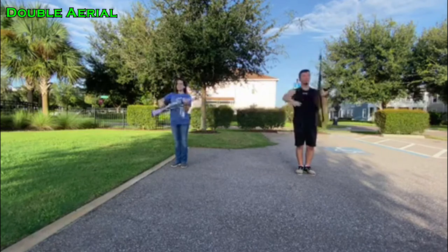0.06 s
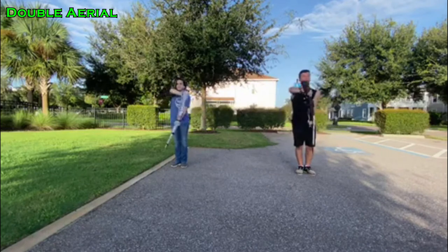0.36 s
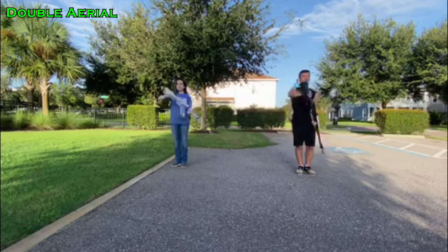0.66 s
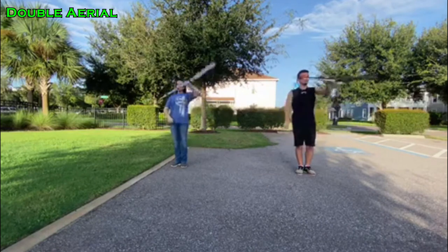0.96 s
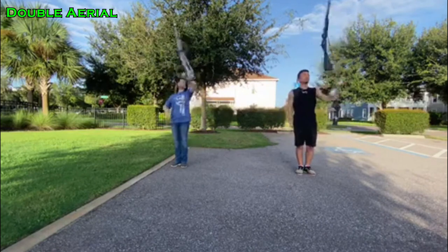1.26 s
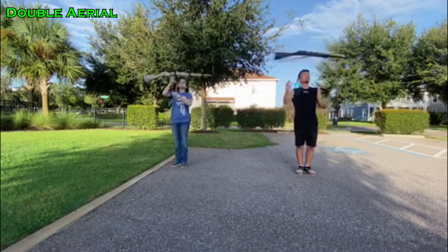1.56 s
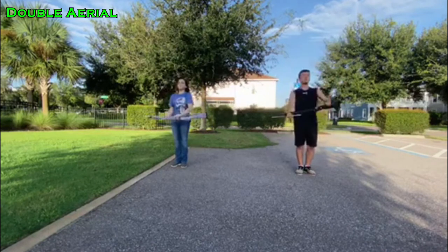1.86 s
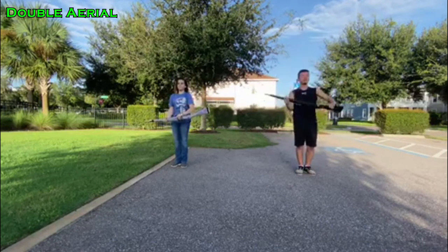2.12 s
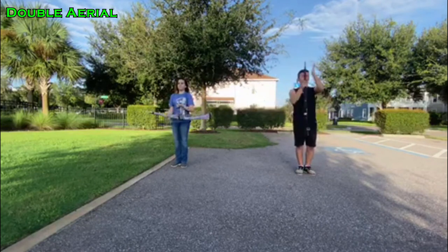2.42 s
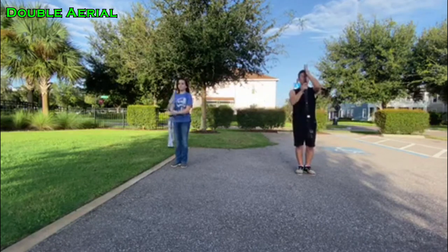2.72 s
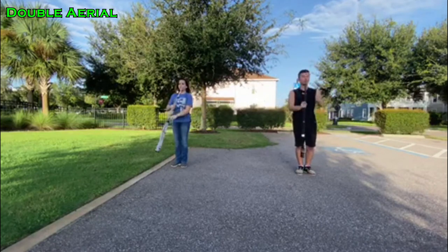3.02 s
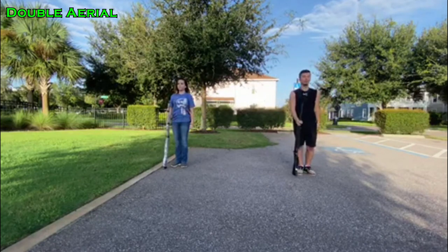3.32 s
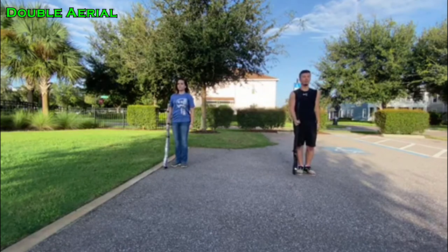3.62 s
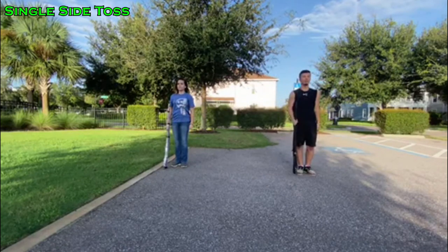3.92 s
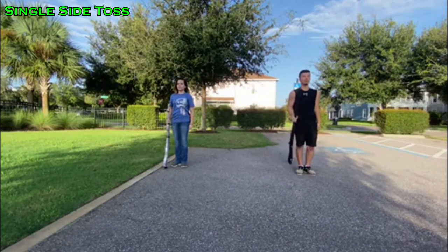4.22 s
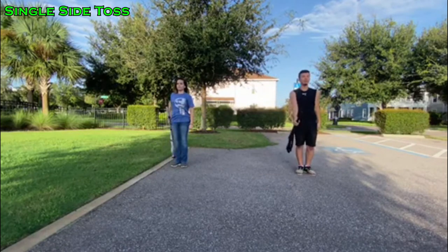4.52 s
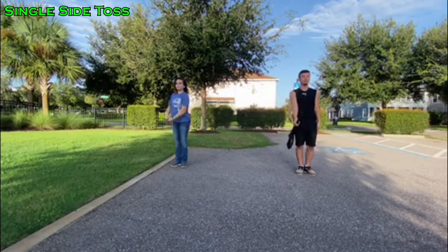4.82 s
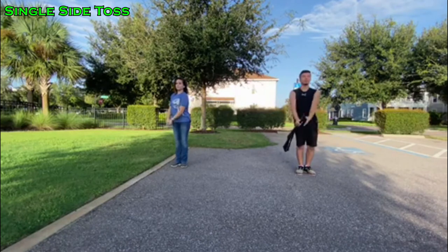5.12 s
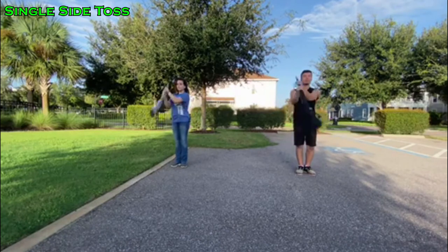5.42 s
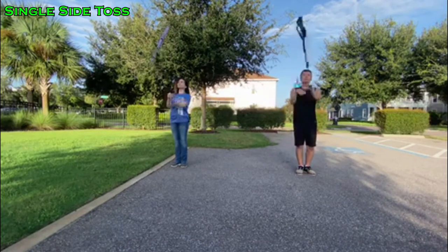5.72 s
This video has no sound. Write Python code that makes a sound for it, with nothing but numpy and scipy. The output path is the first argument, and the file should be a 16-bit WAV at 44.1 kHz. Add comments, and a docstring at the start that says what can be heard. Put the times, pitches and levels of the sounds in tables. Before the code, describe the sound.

Drill rifles are handled on an open street, over a low breeze and distant traffic. For the first second and a half, light palm slaps on wooden stocks mix with small clicks and jiggles of loose steel. At about 1.8 seconds comes a loud catch, a quick cluster of hollow slaps and metal clatter. The wind drops just after 2 seconds. A soft sliding rustle follows, then another slap with rattling strap swivels at 2.5. Around 3 seconds a bird gives one faint, thin, falling whistle. The rifle butts hit the asphalt at 3.2, the loudest moment, and again at 3.35, with hard knocks and bright steel pings, and the swivels bounce to rest by 3.5. A small clink comes at 3.9, a light pat at 4.9 and a bright click at 5.2. The hits echo faintly, and far tyre hiss swells slightly toward the end, near 6 seconds.

```python
"""Sharp slaps and metal rattles ring out as two people spin, toss and catch drill rifles on a street.
Palms hit the wooden stocks and the butts land hard on the asphalt; every blow shakes the loose steel.
Strap swivels flop, and the rifles rustle as they slide. A bird whistles once; trees and houses echo
faintly. Behind it all, a light wind dies down and far traffic rumbles."""
import sys
import numpy as np
from scipy import signal
from scipy.fft import rfft, irfft, next_fast_len
from scipy.io import wavfile
from scipy.ndimage import uniform_filter1d

SR = 44100
rng = np.random.default_rng(int(sys.argv[2]) if len(sys.argv) > 2 else 0)


def bounce(signal):
    """Save signal as a 16-bit WAV file at the path given by the first command-line argument."""
    frames = np.transpose(np.atleast_2d(signal))
    limited = np.clip(frames, -1, 1)
    pcm = np.round(limited * 32767).astype(np.int16)
    wavfile.write(sys.argv[1], SR, pcm)


N = 258867
TIME = np.arange(N) / SR


# blows from a palm or the ground: (time [s], relative level [dB], pop pitch [Hz], steel clash [dB])
BLOWS = [(0.052, -31.5, 617, -41), (0.18, -27, 720, -29), (.199, -36, 1010, -30), (0.237, -34, 1310, -37),
         (0.752, -37, 1190, -42), (1.429, -31.5, 1060, -51.5), (1.699, -32, 1570, -26.5),
         (1.7651, -15.5, 870, -17), (1.768, -12.5, 560, -29), (1.7713, -17, 1730, -21.5),
         (1.791, -19.5, 1546, -25.5), (1.855, -31, 1330, -60), (2.5311, -19, 842, -31),
         (3.21, -8.5, 857, -11.5), (3.213, -22, 218, -40), (3.219, -7.5, 1310, -19),
         (3.231, -18, 1320, -31.5), (3.338, -13, 1290, -18), (3.339, -15, 492, -26),
         (3.376, -28, 885, -24.5), (3.398, -37, 1210, -38.5), (4.865, -32, 960, -58),
         (5.168, -35, 1550, -55), (5.218, -37, 1180, -66)]
# the notes a wooden stock rings at: (pitch [Hz], width [Hz], level [dB])
STOCK_NOTES = [(244, 230, -10), (506, 83, -11), (694, 57, -4), (830, 35, -6), (1370, 300, -5.5),
               (1400, 85, 2), (1640, 68, -7.5)]
def slaps(gain_db=-1.06, pop_width=0.45, stock_db=-3, dull_hz=2600):
    """Each blow makes a hollow pop while the wooden stock knocks."""
    out = np.zeros((2, N))
    for start, db, pop_hz, _ in BLOWS:
        def colour(hz):
            pop = resonance(hz, pop_hz, pop_width * pop_hz) ** 2
            knock = amp(stock_db) * body(STOCK_NOTES, hz)
            return (pop + knock) / (1 + (hz / dull_hz) ** 2)
        add(out, start, amp(db + gain_db) * contact(colour, ring_s=0.026, attack_s=0.0002))
    return out


# a loose bolt, buckle or butt plate clicks: (time [s], relative level [dB], brightness [dB])
LOOSE_CLICKS = [(0.096, -45, 0), (0.174, -36, -2.5), (0.352, -42.5, -1), (0.701, -41, 3.5), (0.808, -35, 5),
                (0.818, -38, 6), (0.856, -41, 5), (0.894, -32.5, 3.5), (1.092, -36, 0), (1.19, -49, 1.5),
                (1.69, -33, -2.5), (1.791, -14, 3.5), (1.803, -24.5, 0.5), (1.865, -29.5, 0.5),
                (1.94, -45.5, -3), (2.37, -40.5, 3), (2.492, -38.5, -2.5), (2.511, -29, -0.5),
                (2.558, -37.5, -3), (2.617, -34, 2), (3.16, -47.5, -1.5), (3.2012, -31, -5.5),
                (3.265, -22, 6), (3.905, -44, 1.5), (4.373, -54.5, -3.5), (5.1666, -23.5, 6.5)]
def fittings():
    """The steel parts clash with every blow and click one by one in between."""
    out = np.zeros((2, N))
    for start, _, _, db in BLOWS:  # many parts meet less sharply than one
        add(out, start, click(db, bright_db=1, ring_s=0.058, attack_s=0.0019))
    for start, db, bright_db in LOOSE_CLICKS:
        ring_s = 0.019 * np.exp(-0.2051 * bright_db)  # smaller, brighter parts go quiet sooner
        add(out, start, click(db, bright_db, ring_s, attack_s=0.00035))
    return out


# the low, middle and high parts of a click: (pitch [Hz], relative level [dB])
CLACK = [(80, -59.5), (300, -7.5), (1100, 3), (1900, -4), (3050, -6.5), (4500, 0), (8000, -60)]
CLINK = [(2000, -48.5), (3800, 0), (5200, 16.5), (6500, 8), (7500, 5.5), (11000, -8.5)]
SIZZLE = [(4000, -48), (7300, -2.5), (9000, 6), (10500, -3), (12400, -2.5), (13500, -2.5), (15000, -5.5),
          (16000, -16.5)]
def click(db, bright_db, ring_s, attack_s):
    """Steel hits steel; more brightness tips the sound from a clack to a sizzle."""
    shares = amp([0.5 - bright_db, -2.5, -0.5 + bright_db])  # clack, clink, sizzle

    def colour(hz):
        metal = steel(hz, crack_db=-12)
        bands = [unit(amp(along(band, hz)) * metal) for band in (CLACK, CLINK, SIZZLE)]
        return sum(share * band for share, band in zip(shares, bands))
    return amp(db) * np.linalg.norm(shares) * contact(colour, ring_s, attack_s)


# the notes the steel parts ring at: (pitch [Hz], width [Hz], level [dB])
STEEL_NOTES = [(2450, 290, 0.5), (2870, 180, 2), (4440, 70, -9), (5107, 87, -8.5), (5980, 250, -1),
               (6430, 81, 1.5), (9140, 100, -12), (10310, 290, -4.5), (12340, 240, -7.5),
               (14850, 200, -8.5)]
def steel(hz, crack_db):
    """The tone of a crack plus ringing steel; each hit rings other parts, so the pitches vary."""
    return 1j * amp(crack_db) + body(STEEL_NOTES, hz, pitch_spread=0.043)


# a strap swivel flops, or bounces to rest once the rifles are down: (time [s], level [dB])
SWIVEL_FLOPS = [(0.359, -42.5), (0.712, -45.5), (0.909, -36), (1.701, -24), (1.723, -25), (2.532, -26.5),
                (2.545, -34), (2.618, -31), (2.626, -40.5), (3.422, -32.5), (3.472, -36.5), (3.505, -38)]
# the notes a swivel rings at: (pitch [Hz], width [Hz], level [dB])
SWIVEL_NOTES = [(1220, 277, -6.5), (2407, 350, -2.5), (2850, 380, 1.5)]
def swivels(dull_hz=4500):
    """A swivel knocks on the wood with a short, hollow ring."""
    out = np.zeros((2, N))
    colour = lambda hz: body(SWIVEL_NOTES, hz, pitch_spread=0.025) / (1 + (hz / dull_hz) ** 4)
    for start, db in SWIVEL_FLOPS:
        add(out, start, amp(db) * contact(colour, ring_s=0.046, attack_s=0.0003))
    return out


# a moving rifle keeps its loose parts jiggling: (start [s], end [s], level [dB])
SHAKES = [(0.184, 0.263, -45.5), (0.341, 0.394, -54), (0.698, 0.79, -57.5), (0.799, 0.837, -52.5),
          (0.905, 0.93, -53), (1.704, 1.735, -40), (1.776, 1.8, -35.5), (2.493, 2.547, -46),
          (3.041, 3.11, -58.5), (3.225, 3.267, -32.5)]
def jiggle(ring_s=0.024, centre_hz=7000, top_hz=12000):
    """Swivels and buckles tick unevenly; the harder the shake, the faster the ticks come."""
    def colour(hz):
        treble = resonance(hz, centre_hz, 2 * centre_hz) ** 2 / (1 + (hz / top_hz) ** 10)
        return steel(hz, crack_db=-9) * treble

    out = np.zeros((2, N))
    for start, end, db in SHAKES:
        length = end - start
        t = np.arange(round((length + ring_s) * SR)) / SR
        ticks_per_s = 150 * np.exp(0.02 * (db + 37))
        count = max(int(length * ticks_per_s), 1)
        tick_times = (np.arange(count) + rng.random(count)) * length / count
        age = t - tick_times[:, None]
        strength = amp(6 * rng.uniform(-0.49, 1, (count, 1)))
        envelope = np.sum(strength * (age > 0) * fade(np.abs(age), ring_s), axis=0)
        ticks = rng.standard_normal((2, len(t))) * envelope
        add(out, start, amp(db) * unit(filtered(ticks, colour)))
    return out


# small steel parts ringing freely: (time [s], level [dB], pitch [Hz], ring time [s])
STEEL_PINGS = [(0.392, -35.5, 9600, 0.067), (1.696, -29, 6620, 0.048), (3.21, -14, 5250, 0.02),
               (3.337, -22, 6000, 0.025), (3.377, -21, 6170, 0.022), (3.903, -41.5, 5860, 0.042),
               (5.167, -25, 9960, 0.013)]
def pings(attack_s=0.0008, detune=0.0042):
    """A small steel part swings free and rings on two notes so close that they shimmer."""
    out = np.zeros((2, N))
    t = np.arange(SR // 2) / SR
    for start, db, hz, ring_s in STEEL_PINGS:
        notes = [(0.98, hz), (0.5, hz * (1 + detune))]
        ring = sum(share * np.sin(2 * np.pi * (pitch * t + rng.random())) for share, pitch in notes)
        add(out, start, amp(db) * ring * strike(t, ring_s, attack_s))
    return out


# a rifle slides through a hand, along its strap or over the ground:
# (time [s], half length [s], level [dB])
SLIDES = [(2.228, 0.061, -58.5), (2.363, 0.015, -52.5), (3.265, 0.012, -23.5), (5.526, 0.12, -69.5)]
# the tone of that sliding: (pitch [Hz], relative level [dB])
SLIDE_TONE = [(3500, -17.5), (5800, 3), (7500, -5), (9500, -2), (15500, -9.5)]
def rustles(grain_db=5):
    """Sliding makes a soft, grainy hiss that swells and fades."""
    envelope = sum(amp(db) * bump(middle, half) for middle, half, db in SLIDES)
    grains = amp(grain_db * wobble(200)) * stereo_noise(N, RIFLE_LIKENESS, RIFLE_BALANCE)
    return envelope * shaped(grains, SLIDE_TONE)


# how alike the rifles sound on the left and right: (pitch [Hz], likeness [0 to 1])
RIFLE_LIKENESS = [(250, 1), (1400, 0.88), (4000, 0.33), (9000, 0.773)]
# which side they are louder on: (pitch [Hz], left minus right [dB])
RIFLE_BALANCE = [(200, -0.5), (550, 10), (1200, 5), (2300, -2), (4500, -3.5), (8000, 0.5)]
def contact(colour, ring_s, attack_s):
    """Hard parts chatter for an instant as they meet; colour gives the tone of the thing they hit."""
    t = np.arange(SR // 10) / SR
    envelope = strike(t, ring_s, attack_s)
    chatter = stereo_noise(len(t), RIFLE_LIKENESS, RIFLE_BALANCE) * envelope
    # a sharp blow feeds all pitches about evenly, so flatten the noise before colouring it
    power = np.mean(np.abs(rfft(chatter, padded(len(t)))) ** 2, axis=0)
    flatten = np.abs(uniform_filter1d(power, size=33)) ** -0.5
    hit = filtered(chatter, lambda hz: flatten * colour(hz))
    return unit(hit) * np.sqrt(np.mean(envelope ** 2))


# the bird's whistle starts, holds, swells and trails away: (time [s], pitch [Hz], level [dB])
WHISTLE = [(2.86, 3470, -75), (2.878, 3440, -62), (2.972, 3365, -59), (3.0, 3295, -46), (3.036, 3300, -52),
           (3.05, 3265, -61), (3.14, 3160, -68)]
def bird(flutter_db=2, upper_hz=5980, upper_db=-66):
    """A bird gives one thin, wavering, falling whistle, with a faint second note held above it."""
    def tone(pitch, waver):
        wavering_hz = pitch * (1 + waver * wobble(120))
        return np.sin(2 * np.pi * np.cumsum(wavering_hz) / SR)

    times, hz, db = np.transpose(WHISTLE)
    singing = (TIME > times[0]) & (TIME < times[-1])
    arch = np.sin(np.pi * np.interp(TIME, [times[0], times[-1]], [0, 1]))
    loudness = amp(np.interp(TIME, times, db) + flutter_db * wobble(500))
    whistle = singing * loudness * tone(np.interp(TIME, times, hz), waver=0.0045)
    return whistle + amp(upper_db) * arch * tone(upper_hz, waver=0.012)


# how long trees and houses keep echoing: (pitch [Hz], ring time [s])
ECHO_TIMES = [(1000, 0.18), (5000, 0.66), (14000, 0.38)]
def echoes(sound, near_db=-15, near_ring_s=0.14, near_per_s=400, far_db=-15.5):
    """Sound bounces quickly off the ground and the people, then faintly off trees and houses."""
    hz, t, spectrum = signal.stft(rng.standard_normal((2, SR)), SR, nperseg=256)
    spectrum *= fade(t, along(ECHO_TIMES, hz)[:, None])
    far = signal.istft(spectrum, SR, nperseg=256)[1][:, :SR]
    bounces = rng.standard_normal((2, SR)) * (rng.random(SR) < near_per_s / SR)
    near = bounces * fade(np.arange(SR) / SR, near_ring_s)
    answer = (amp(near_db) * unit(near) + amp(far_db) * unit(far)) / np.sqrt(SR)
    return signal.fftconvolve(sound, answer, axes=1)[:, :N]


# short gusts: (time [s], half length [s], rise [dB])
WIND_GUSTS = [(1.73, 0.12, 9), (3.6, 0.06, 10)]
# the wind's low rumble: (pitch [Hz], relative level [dB])
WIND_TONE = [(18, -39.5), (47, -5), (68, -1.5), (150, -6.5), (330, -20), (600, -72)]
def wind(breeze_db=-40, lull_db=-51, drop_at_s=2.076, drop_length_s=0.036):
    """A breeze rumbles, then drops to a lull; two gusts rise on top of it."""
    base_db = np.interp(TIME, [drop_at_s, drop_at_s + drop_length_s], [breeze_db, lull_db])
    return amp(base_db + swells(WIND_GUSTS)) * rush(WIND_TONE)


# cars swell the drone, and their tyres hiss louder as they near: (time [s], half length [s], rise [dB])
DRONE_SWELLS = [(2.0, 0.24, 8), (4.18, 0.073, 6), (4.7, 0.041, 4), (5.0, 0.73, 5.5)]
TYRE_SWELLS = [(6.4, 6.03, 4.5), (5.45, 0.86, 3)]
# the tone of the drone and of the hiss: (pitch [Hz], relative level [dB])
DRONE_TONE = [(50, -37.5), (100, -0.5), (165, -8), (220, 1.5), (290, -7), (400, -9), (1200, -34.5),
              (3000, -55.5), (9000, -95.5)]
TYRE_TONE = [(200, 2), (550, 9), (1700, 1.5), (2600, -1.5), (3500, -10), (4900, -7.5), (6300, -14),
             (7500, -22), (11800, -26), (13500, -43.5)]
def traffic(drone_db=-49.5, tyre_db=-57.5):
    """Far cars make an uneven drone and a smooth hiss of tyres."""
    drone = amp(drone_db + swells(DRONE_SWELLS)) * rush(DRONE_TONE)
    hiss = amp(tyre_db + swells(TYRE_SWELLS)) * rush(TYRE_TONE)
    return drone + hiss


# how alike the background sounds on the left and right: (pitch [Hz], likeness [0 to 1])
BACKGROUND_LIKENESS = [(290, 0.95), (640, 0.035), (3100, 0.63), (15000, 0.074)]
# which side it is louder on: (pitch [Hz], left minus right [dB])
BACKGROUND_BALANCE = [(60, 1.5), (380, 5.5), (700, 2.5), (8000, 0)]
def rush(tone):
    """Steady, wide background noise with the given tone."""
    return shaped(stereo_noise(N, BACKGROUND_LIKENESS, BACKGROUND_BALANCE), tone)


def left_first(sound, lead_s=0.000195, above_hz=2200):
    """High pitches reach the left microphone just before the right."""
    def response(hz):
        treble = 1 - 1 / (1 + (hz / above_hz) ** 20)
        return np.exp(1j * np.pi * lead_s * np.outer([1, -1], hz * treble))
    return filtered(sound, response)


def stereo_noise(n, likeness, balance):
    """Left and right noise, made of a part they share and a part that sets them apart."""
    def shares(hz):
        angle = np.arccos(np.clip(along(likeness, hz), -1, 1)) / 2
        return np.array([np.cos(angle), np.sin(angle)])
    mid, side = filtered(rng.standard_normal((2, n)), shares)
    lean = lambda hz: amp(np.outer([1, -1], along(balance, hz)) / 2)
    return filtered(np.array([mid + side, mid - side]), lean)


def body(notes, hz, pitch_spread=0.0):
    """The tone of an object struck at a new spot each time, which changes how loud each note is."""
    response = 0
    for k, (pitch, width, db) in enumerate(notes):
        gain = (-1) ** k * amp(db + 1.8 * rng.standard_normal())
        centre = pitch * np.exp(pitch_spread * rng.standard_normal())
        response += gain * resonance(hz, centre, width)
    return response


def resonance(hz, centre, width):
    """One ringing note: pitches near the centre pass, the rest are turned down."""
    return 1j * hz * width / (centre ** 2 - hz ** 2 + 1j * hz * width)


def filtered(sound, response):
    """Change each pitch in a sound by response(hz)."""
    n = sound.shape[-1]
    size = padded(n)
    hz = np.fft.rfftfreq(size, 1 / SR)
    return irfft(rfft(sound, size) * response(hz), size)[..., :n]


def padded(n):
    """A length with spare room for a short ring."""
    return next_fast_len(n + 2048, True)


def shaped(noise, tone):
    """Give noise the tone in a table, at strength 1."""
    return unit(filtered(noise, lambda hz: amp(along(tone, hz))))


def along(points, hz):
    """Read between the rows of a (pitch, value) table, spacing octaves evenly."""
    pitches, values = np.transpose(points)
    return np.interp(np.log(hz + 1), np.log(pitches + 1), values)


def fade(t, ring_s):
    """Die away by 60 dB over the ring time."""
    return np.exp(-np.log(1000) * t / np.maximum(ring_s, 1e-3))


def strike(t, ring_s, attack_s):
    """Rise quickly, then die away."""
    return (1 - np.exp(-t / attack_s)) * fade(t, ring_s)


def bump(middle_s, half_s):
    """A smooth rise to 1 and back."""
    return np.exp(-((TIME - middle_s) / half_s) ** 2)


def swells(rows):
    """Smooth rises added up, in dB."""
    return sum(db * bump(middle, half) for middle, half, db in rows)


def wobble(samples):
    """A random wander; smoothing over more samples makes it slower."""
    return unit(uniform_filter1d(rng.standard_normal(N), size=samples))


def amp(db):
    """Turn decibels into a multiplier."""
    return 10 ** (np.asarray(db) / 20)


def unit(x):
    """Scale to an average strength (rms) of 1."""
    return x / np.sqrt(np.mean(np.abs(x) ** 2) + 1e-20)


def add(track, start_s, sound):
    """Mix a sound in at its start time."""
    part = track[:, max(round(start_s * SR), 0):][:, :sound.shape[-1]]
    part += sound[..., :part.shape[1]]


def scene():
    """The rifles and the bird echo in the open street, over wind and traffic."""
    rifles = slaps() + fittings() + swivels() + jiggle() + pings() + rustles()
    whistle = bird()
    return left_first(rifles) + whistle + echoes(rifles + whistle) + wind() + traffic()


def record(dry, ceiling=0.85, top_hz=15800):
    """Round off the loudest peaks and cut the very highest pitches."""
    rounded = dry / (1 + np.abs(dry / ceiling) ** 6) ** (1 / 6)
    return filtered(rounded, lambda hz: 1 / np.sqrt(1 + (hz / top_hz) ** 200))


dry = scene()
out = record(dry)
bounce(out)
```